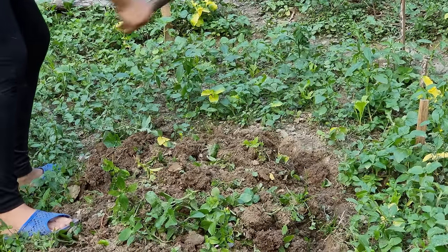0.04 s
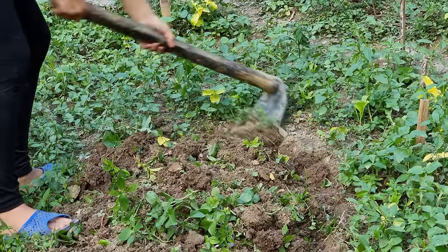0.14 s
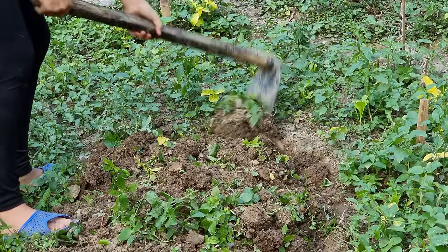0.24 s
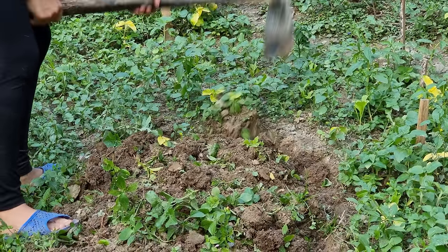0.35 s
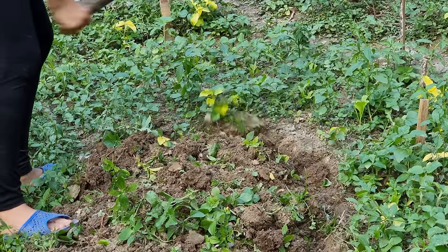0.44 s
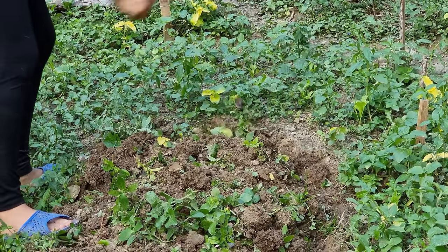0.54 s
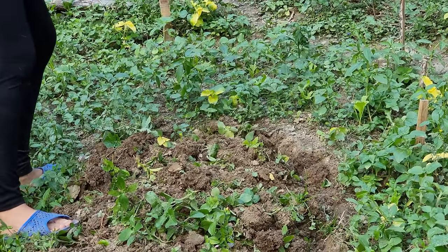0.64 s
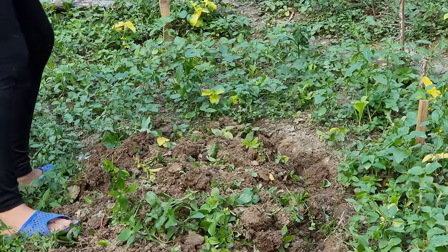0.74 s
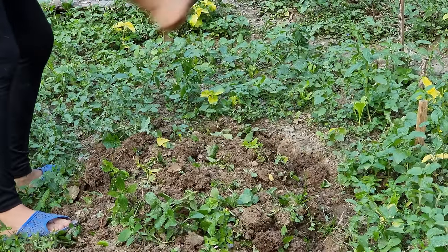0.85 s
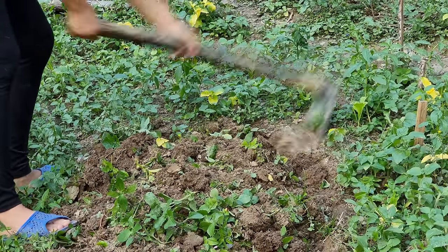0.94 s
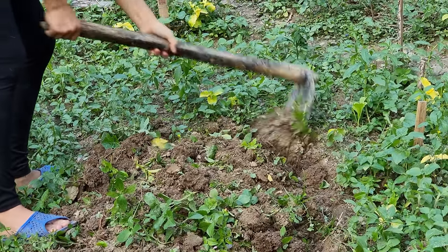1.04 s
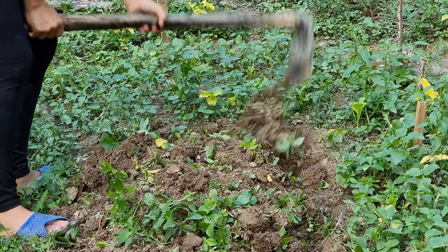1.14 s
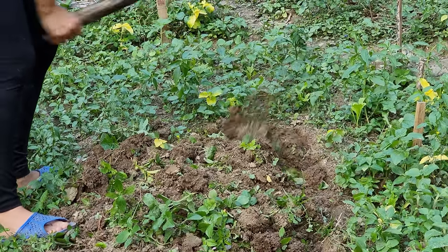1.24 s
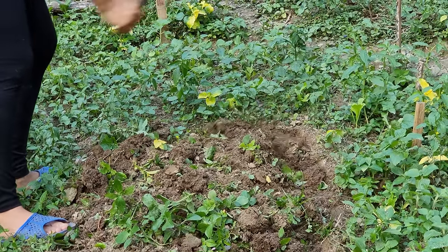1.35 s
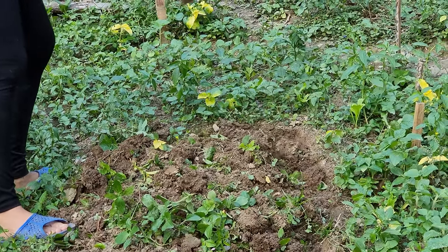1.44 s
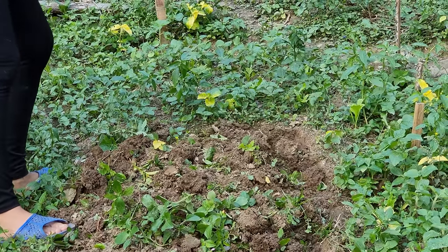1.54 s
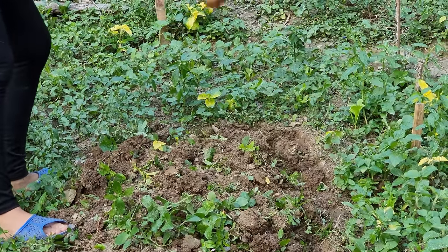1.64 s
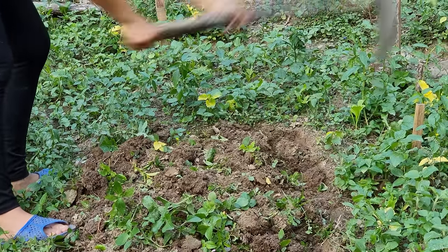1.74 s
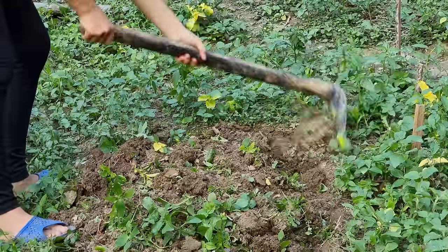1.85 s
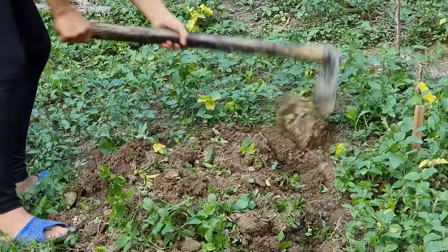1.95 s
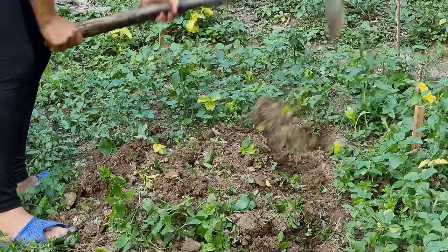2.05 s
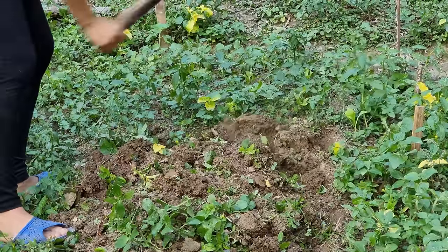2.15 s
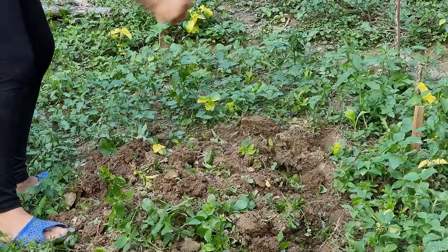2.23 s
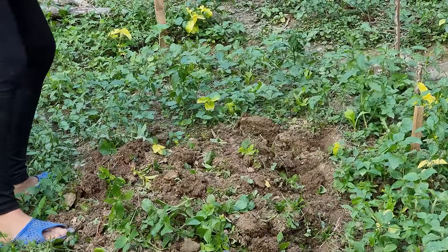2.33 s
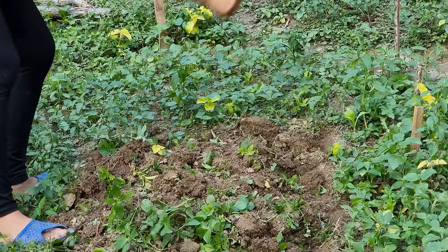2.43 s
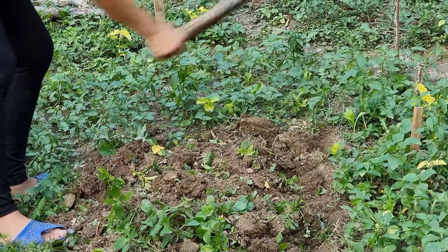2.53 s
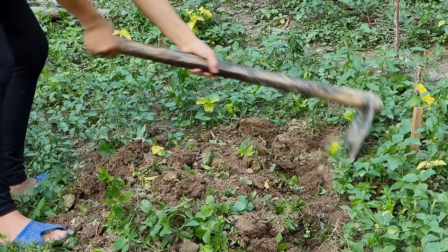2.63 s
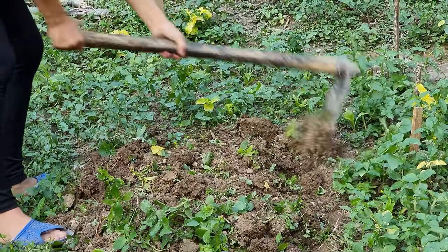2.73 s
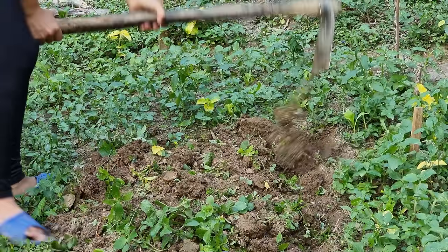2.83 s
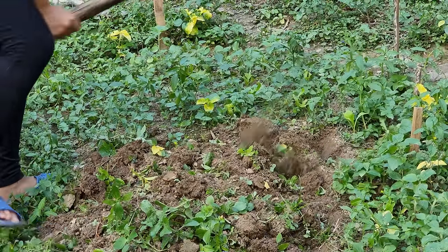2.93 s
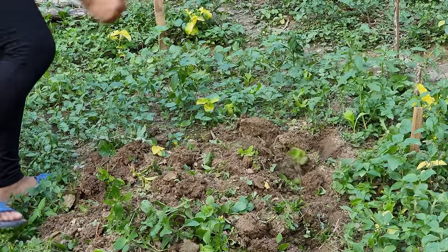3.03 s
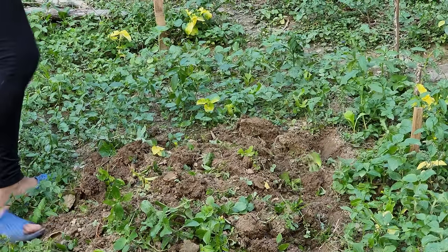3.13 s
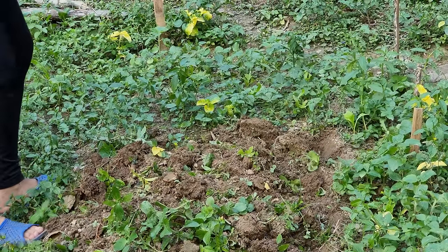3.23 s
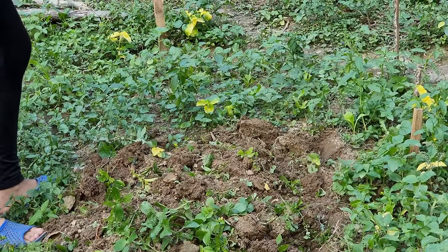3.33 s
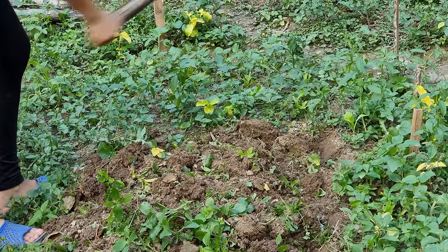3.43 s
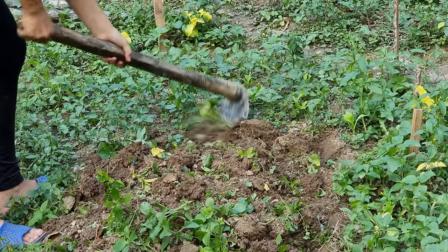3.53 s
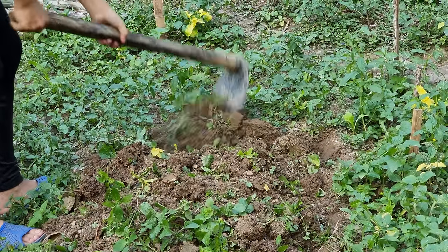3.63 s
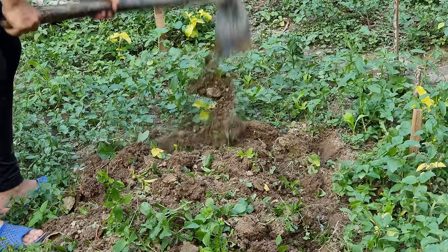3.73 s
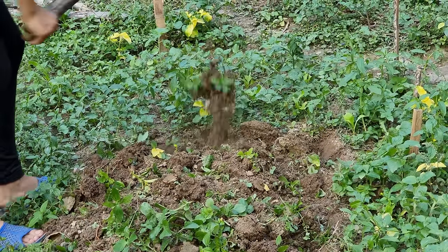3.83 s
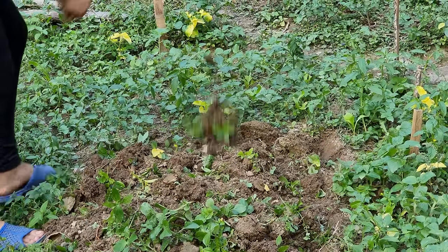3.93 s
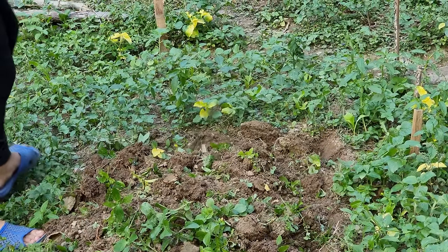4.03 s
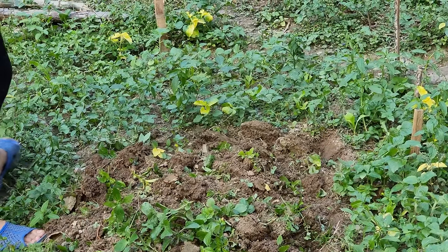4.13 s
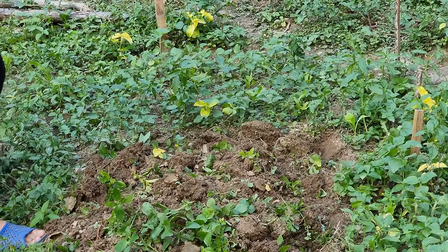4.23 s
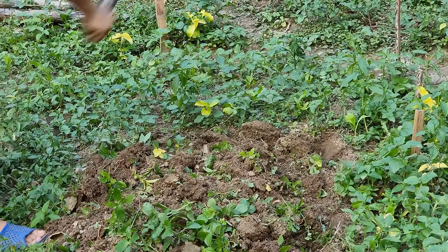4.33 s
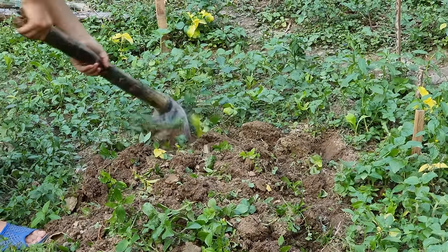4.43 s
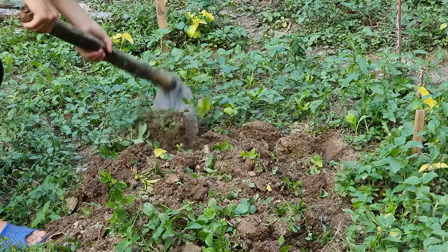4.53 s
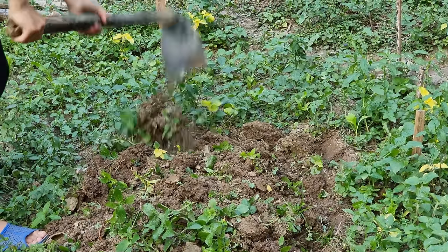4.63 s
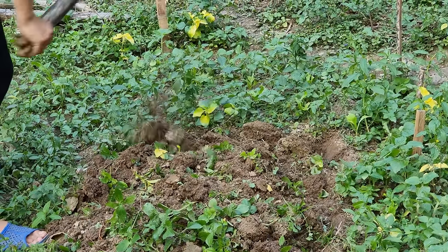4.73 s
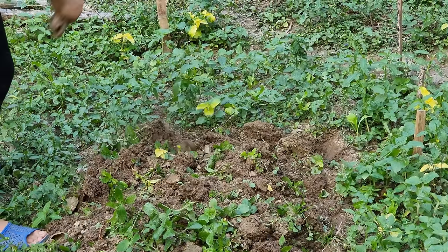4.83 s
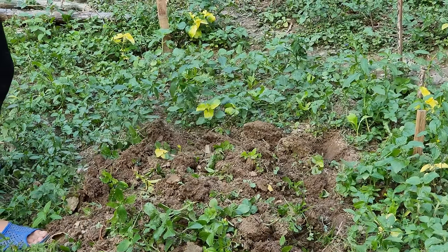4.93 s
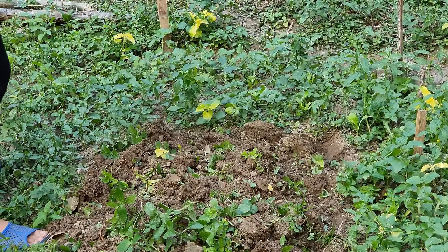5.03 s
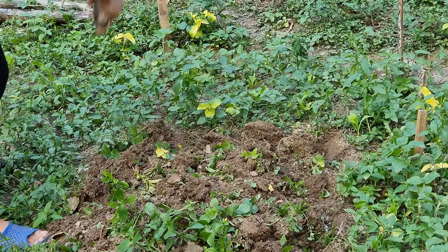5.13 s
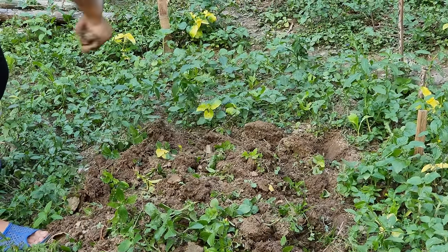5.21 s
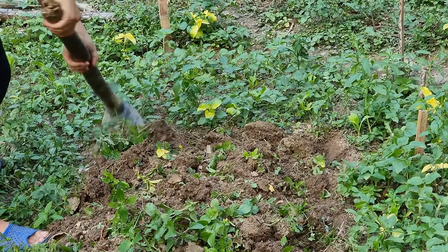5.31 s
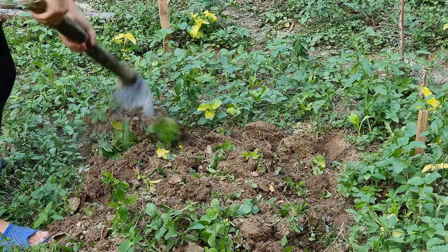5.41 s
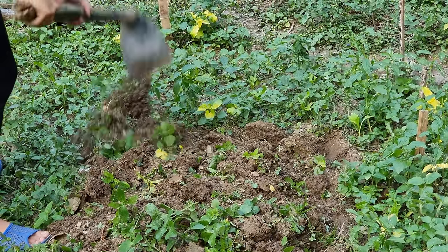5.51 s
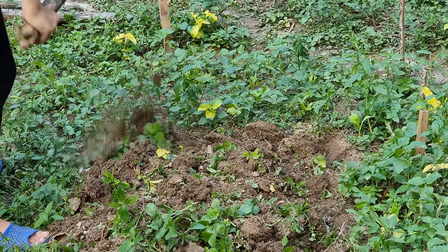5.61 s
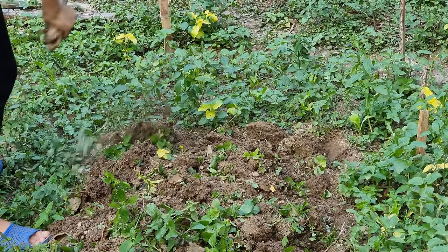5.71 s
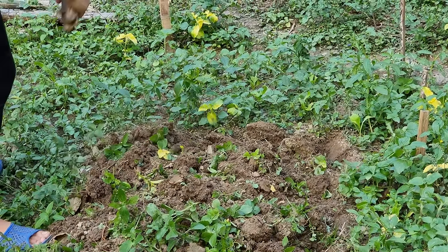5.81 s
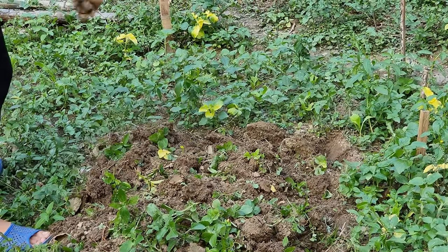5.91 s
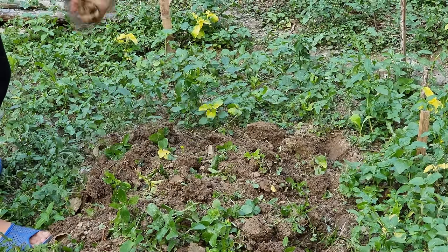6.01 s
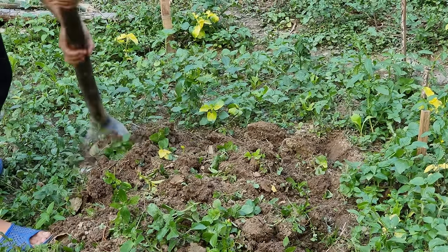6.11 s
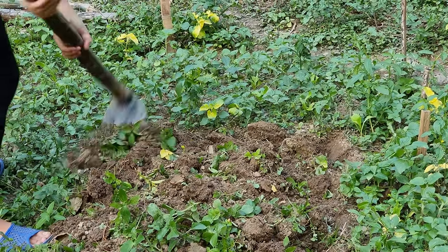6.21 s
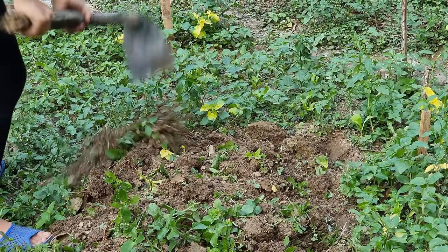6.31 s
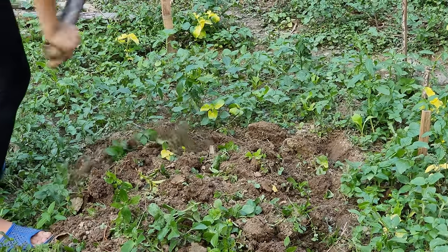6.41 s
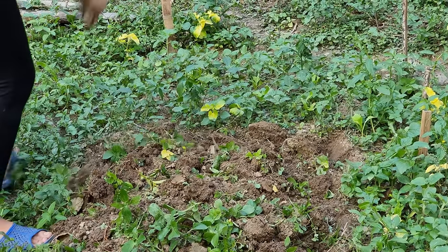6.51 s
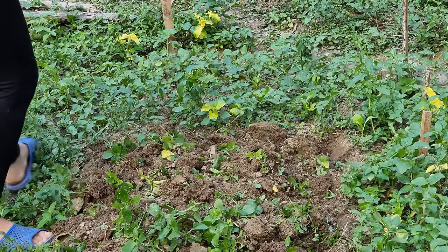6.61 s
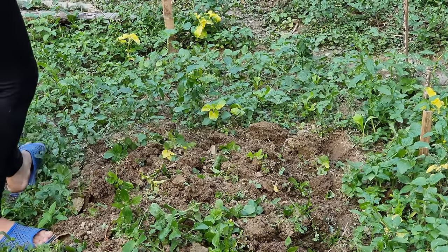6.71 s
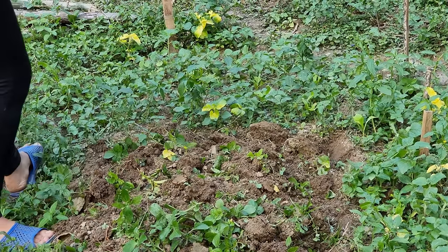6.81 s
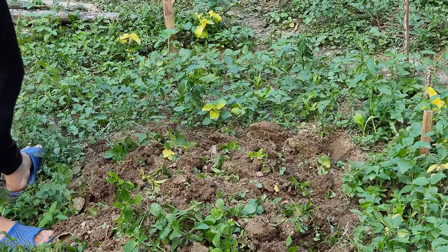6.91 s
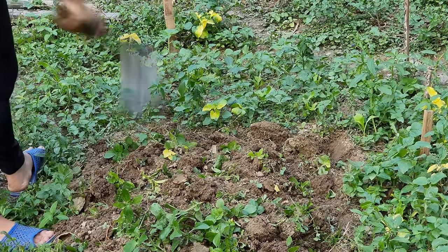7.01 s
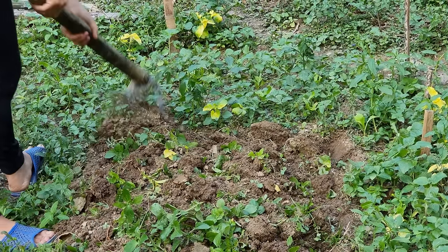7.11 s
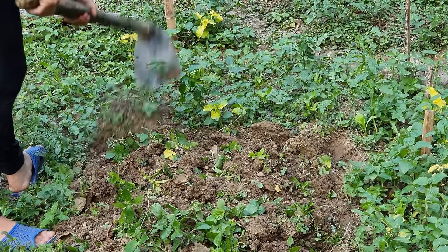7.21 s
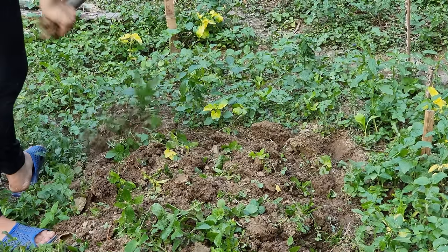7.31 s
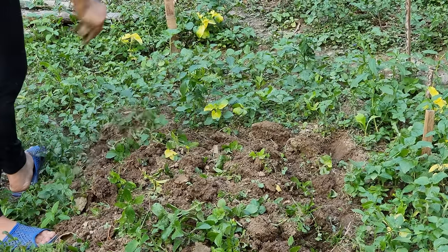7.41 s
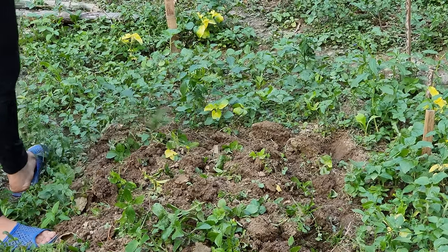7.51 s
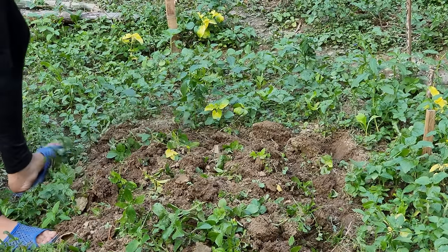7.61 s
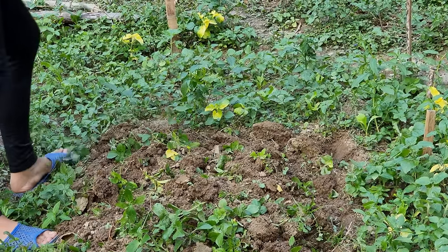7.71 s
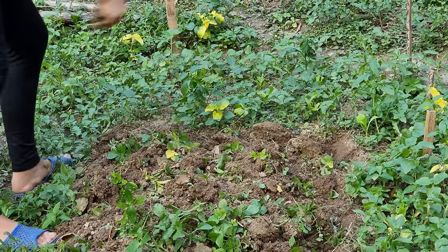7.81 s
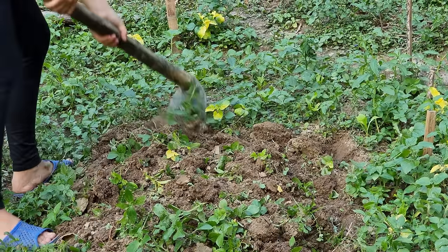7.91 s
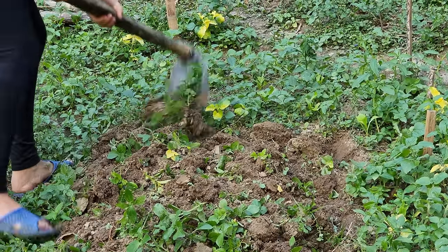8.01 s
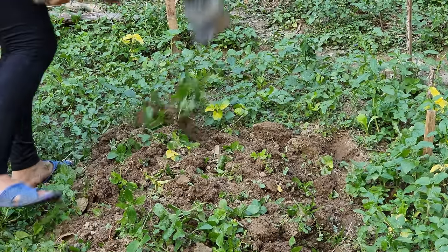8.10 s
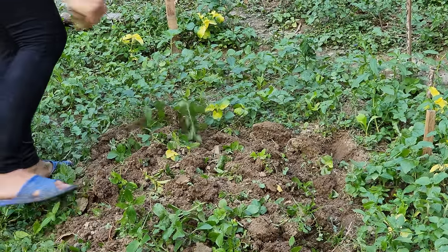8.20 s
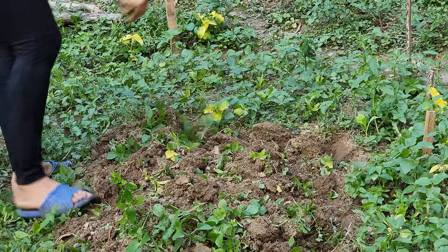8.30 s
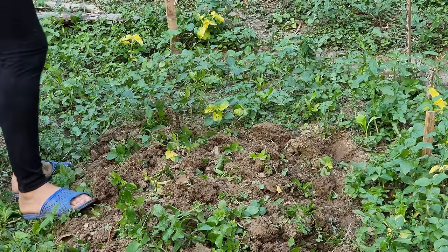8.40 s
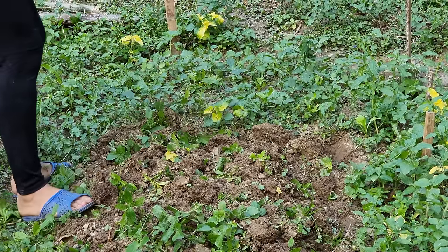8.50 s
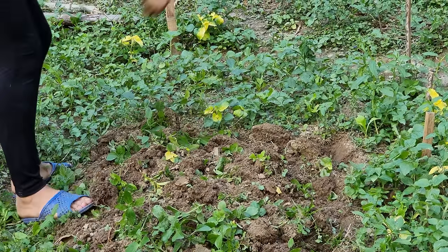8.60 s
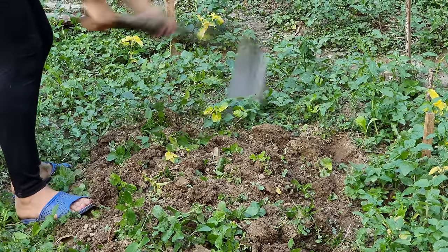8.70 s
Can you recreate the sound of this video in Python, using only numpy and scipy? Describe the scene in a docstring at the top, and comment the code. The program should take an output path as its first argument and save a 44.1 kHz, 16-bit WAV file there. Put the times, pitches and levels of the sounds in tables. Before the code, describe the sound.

Steady hoeing heard from close by in stereo: a sharp double-edged crunch and damped blade clank roughly every 0.85 seconds, followed by a brief crumble of loose earth. Between strokes come small snaps, light taps of crumbs on leaves and soft footfalls. Two faint bird chirps pass early on. Low engines waver far away beneath a steady wide open-air hiss, and the strokes leave a faint short echo.

```python
"""Hoeing garden soil

A long-handled hoe chops ten times in a steady rhythm: noise-driven blade modes and shaped noise bursts.
Each stroke swishes through weeds, bites gritty earth with a short damped clank and leaves crumbs falling.
Stems snap, sandals shuffle, clods drop, the ground thumps; a decaying noise tail echoes the yard faintly.
Far birds are gliding sines, two distant engines are sines of changing rate; filtered noise is the open air.
"""
import sys
import numpy as np
from scipy import signal
from scipy.fft import rfft, irfft, next_fast_len
from scipy.io import wavfile
from scipy.ndimage import uniform_filter1d

SR = 44100
rng = np.random.default_rng(int(sys.argv[2]) if len(sys.argv) > 2 else 0)


def transcribe(u):
    """Save the signal u as a 16-bit wav file named by the first command-line argument.

    u: samples, shape (n,) or (channels, n), limited to [-1, 1]; the rate is SR.
    q: integer samples, one column per channel.
    """
    v = np.clip(np.atleast_2d(u).T, -1, 1)
    q = np.round(v * 32767).astype(np.int16)
    wavfile.write(sys.argv[1], SR, q)


N = 385875
TIME = np.arange(N) / SR
EVENT_TIME = np.arange(-SR // 10, SR // 4) / SR


def from_db(db):
    """Decibels to gain."""
    return 10 ** (np.asarray(db) / 20)


def rms_one(x):
    """Scale to unit power."""
    return x / np.sqrt(np.mean(x ** 2) + 1e-20)


def at_hz(points, hz):
    """Read a spectrum on a log-frequency axis."""
    knots, values = np.transpose(points)
    return np.interp(np.log(hz + 1), np.log(knots), values)


def shaped(x, gain_at):
    """Weight a signal by a function of frequency."""
    size = next_fast_len(x.shape[-1], True)
    hz = np.arange(size // 2 + 1) * SR / size
    return irfft(rfft(x, size) * gain_at(hz), size)[..., :x.shape[-1]]


def coloured(x, spectrum):
    """Give noise a spectrum that falls away beyond its ends; rms 1."""
    (low_hz, low_db), (high_hz, high_db) = spectrum[0], spectrum[-1]
    closed = [(low_hz / 2, low_db - 30), *spectrum, (high_hz * 2, high_db - 40)]
    return rms_one(shaped(x, lambda hz: from_db(at_hz(closed, hz))))


def stereo(mid, side, likeness):
    """Mix mid and side noise so that left and right correlate by the likeness at each frequency."""
    def alike(hz):
        """Correlation of left and right."""
        return np.clip(at_hz(likeness, hz), -1, 1)

    common = shaped(mid, lambda hz: np.sqrt((1 + alike(hz)) / 2))
    opposed = shaped(side, lambda hz: np.sqrt((1 - alike(hz)) / 2))
    return common + opposed * [[1], [-1]]


def drift(knots_per_s, size=N):
    """Random wander: straight lines between normal knots."""
    knots = rng.standard_normal(4096)
    return np.interp(np.arange(size) / SR * knots_per_s, np.arange(len(knots)), knots)


def grains(spread_db):
    """A short dense stream of tiny fractures of uneven size; rms 1."""
    size = len(EVENT_TIME)
    unevenness = np.minimum(rng.exponential(1, size), 4)
    return rms_one(rng.standard_normal(size) * from_db(spread_db * unevenness))


def resonate(x, hz, width_hz):
    """A two-pole resonance that passes white noise with its power kept."""
    r = np.exp(-np.pi * width_hz / SR)
    zeros = np.sqrt((1 - r * r) / 2) * np.array([1, 0, -1])
    poles = [1, -2 * r * np.cos(2 * np.pi * hz / SR), r * r]
    return signal.lfilter(zeros, poles, x + 1e-18)


def burst(db, rise_s, hold_s, fall_s):
    """Envelope that swells up to time zero, holds, then dies away."""
    swell = np.minimum(EVENT_TIME, 0) / rise_s
    decay = np.maximum(EVENT_TIME - hold_s, 0) / fall_s
    return from_db(db) * np.exp(swell - decay)


def add(out, s, sound):
    """Mix in a short sound whose own time zero falls at s."""
    start = max(round((s + EVENT_TIME[0]) * SR), 0)
    out[start:start + len(sound)] += sound[:N - start]


# left-right correlation of the open air: (frequency [Hz], likeness [-1 to 1])
AIR_CORRELATION = [(60, 0.95), (130, 0.89), (290, 0.93), (640, 0.46), (1400, -0.49), (3000, -0.025),
                   (15000, -0.037)]
# foliage hiss colour: (frequency [Hz], relative density [dB per Hz])
HISS_SPECTRUM = [(260, -49), (450, 1.5), (623, -5.5), (756, 0), (876, -1), (1180, 3), (1430, -0.5),
                 (2130, -3), (2950, -0.5), (4960, -10), (5420, -8.5), (5830, -13.5), (7180, -12),
                 (11000, -18), (15500, -15)]


def foliage():
    """Many rustling leaves sum to a steady wide hiss."""
    noise = stereo(*rng.standard_normal((2, N)), AIR_CORRELATION)
    return from_db(-53.05) * coloured(noise, HISS_SPECTRUM)


# far traffic colour: (frequency [Hz], relative density [dB per Hz])
TRAFFIC_SPECTRUM = [(20, -16), (40, -2), (70, 6), (130, -5), (200, -5), (340, -5.5), (420, -9),
                    (540, -30.5), (900, -67)]


def traffic():
    """Far traffic is bass noise whose level flutters."""
    level = from_db(-48.5 + 0.89 * drift(22))
    noise = stereo(*rng.standard_normal((2, N)), AIR_CORRELATION)
    return level * coloured(noise, TRAFFIC_SPECTRUM)


# insect-like hiss: (frequency [Hz], width [Hz], level [dB])
INSECT_BANDS = [(6480, 450, -69), (7150, 260, -72)]


def insects():
    """Thin bands of noise, independent left and right."""
    return sum(from_db(db) * resonate(rng.standard_normal((2, N)), hz, width_hz)
               for hz, width_hz, db in INSECT_BANDS)


FINE_TEXTURE_DB, BROAD_TEXTURE_DB = 4.37, 1.2


def open_air():
    """Hiss, rumble and insect bands sum to the open air, given a random fine and broad level texture."""
    air = foliage() + traffic() + insects()
    bands = signal.stft(air, nperseg=2048)[2]
    fine, broad = rng.standard_normal((2, *bands.shape[1:]))
    broad = uniform_filter1d(broad, size=15, axis=0)  # across frequency
    broad = rms_one(uniform_filter1d(broad, size=2, axis=1))  # across time
    texture = from_db(FINE_TEXTURE_DB * fine + BROAD_TEXTURE_DB * broad)
    return signal.istft(bands * texture)[1][:, :N]


def engine_track(rows):
    """Rate [Hz], phase [rad] and level [dB] of one engine over time."""
    s, *columns = np.transpose(rows)
    hz, db = [np.interp(TIME, s, c) for c in columns]
    phase = 2 * np.pi * np.cumsum(hz) / SR + 2 * np.pi * rng.random()
    return hz, phase, db


# heavy engine labours, slows, picks up again: (time [s], cycle rate [Hz], load [dB])
TRUCK_COURSE = [(0, 38.5, -8), (1.7, 39, -24), (2.95, 39, -22), (3.38, 37.4, 2), (3.77, 35.1, -1.5),
                (4.6, 32.7, 2), (5.41, 31.2, 9), (5.9, 30.4, -4), (7.15, 28.3, -0.5), (7.5, 28.9, -6),
                (7.9, 31.6, -8), (8.75, 33.3, -8.5)]
# exhaust orders 2 to 5: (level at 0 dB load, before muffler [dB], share of load swing [ratio])
EXHAUST_ORDERS = [(-53.5, 0.033), (-45, .95), (-43, 0.42), (-46.5, 0.1)]
MUFFLER_HZ, MUFFLER_DB_PER_OCTAVE = 108.8, -29


def truck():
    """Low exhaust orders follow the load, waver on the way and fall off above the muffler's corner."""
    hz, phase, load_db = engine_track(TRUCK_COURSE)
    out = 0
    for order, (db, share) in enumerate(EXHAUST_ORDERS, 2):
        octaves_above = np.maximum(np.log2(order * hz / MUFFLER_HZ), 0)
        level_db = db + share * load_db + MUFFLER_DB_PER_OCTAVE * octaves_above + drift(3.6)
        out = out + from_db(level_db) * np.sin(order * phase)
    return np.sqrt(2) * out


# lighter engine runs down, pulls away, cruises: (time [s], firing rate [Hz], rms level [dB])
CAR_COURSE = [(0, 75.1, -40.5), (.8, 73.26, -42.5), (1.25, 69.3, -49), (1.85, 61.4, -45), (2.1, 54, -54),
              (2.6, 45.6, -62), (2.72, 43.95, -42), (3.2, 50.65, -45.5), (3.45, 63, -40), (3.7, 70.3, -51),
              (4.0, 73.7, -41.5), (4.6, 69, -45), (5.5, 75.5, -45), (6.6, 73.3, -40.5), (7.5, 70.5, -49),
              (8.75, 72, -42.5)]


def car():
    """Only the firing rate carries this far: one sine that wavers on the way."""
    _, phase, db = engine_track(CAR_COURSE)
    return np.sqrt(2) * from_db(db + drift(3.7)) * np.sin(phase)


def crumbs():
    """Soft crumbs fall at random times, each tapping a leaf at its own pitch."""
    out = np.zeros(N)
    for when, pitch, size in rng.random(size=(140, 3)):
        hz = 1000 * 7 ** pitch
        tap = grains(1.5) * burst(-60 + 9 * size ** 3, rise_s=0.0037, hold_s=0.0078, fall_s=0.013)
        add(out, when * N / SR, resonate(tap, hz, width_hz=hz / 7))
    return out


# stems snap, clods and pebbles drop: (time [s], nominal level [dB], pitch [Hz])
SNAPS = [(0.144, -35, 3270), (0.5087, -34.5, 3020), (0.7938, -34.5, 1850), (1.756, -21, 3100),
         (2.392, -31, 3030), (3.052, -35, 2900), (3.5289, -30.5, 3220), (4.447, -27.5, 3300),
         (4.458, -25, 3300), (4.8796, -33.5, 1020), (5.024, -33, 2863), (5.151, -35, 5340),
         (5.198, -31.5, 1000), (6.3809, -33, 2890), (6.505, -35.5, 1080), (8.4996, -31.5, 3650)]


def snaps():
    """A crack that dies in milliseconds plus a weaker rustle, both partly resonant."""
    out = np.zeros(N)
    for s, db, hz in SNAPS:
        crack = burst(db - 15.5, rise_s=0.00015, hold_s=0.00083, fall_s=0.006)
        rustle = burst(db - 22.5, rise_s=0.0003, hold_s=0.0019, fall_s=0.028)
        snap = grains(1.6) * (crack + rustle)
        add(out, s, resonate(snap, hz, width_hz=500) + 0.73 * snap)
    return out


# spread of phase between the ports: (frequency [Hz], rms difference [rad])
PORT_PHASE_SPREAD = [(100, .12), (500, 0.6), (2500, 1.03), (4000, 1.33), (8000, 2.65), (15000, 2.33)]
# treble mismatch of the ports: (frequency [Hz], left minus right [dB])
PORT_BALANCE = [(1400, 1), (2300, -0.5), (4000, 0), (6800, 4), (8600, -3.5), (11000, 0), (12400, -5),
                (15000, -2)]


def microphones(x):
    """A near sound reaches two ports with phases that differ more in the treble."""
    knots_hz = np.arange(0, SR / 2, 350)
    twist = np.sqrt(2) * np.sin(2 * np.pi * rng.random(len(knots_hz)))

    def response(hz):
        """Opposite halves of the phase and level difference go to left and right."""
        sides = np.array([[.5], [-.5]])
        phase = np.interp(hz, knots_hz, twist) * at_hz(PORT_PHASE_SPREAD, hz)
        return np.exp(1j * sides * phase) * from_db(sides * at_hz(PORT_BALANCE, hz))

    return shaped(x, response)


# echo colour: (frequency [Hz], relative gain [dB])
ECHO_SPECTRUM = [(150, -38), (500, 15), (1200, -5), (3300, 0.5), (6000, 1), (10000, -1), (15000, -68)]


def yard(x, t60_s, treble_t60_s, echo_db):
    """Plants and far walls scatter a faint tail whose treble dies first."""
    t = TIME[:SR]
    noise = rng.standard_normal((2, SR))
    low = signal.sosfilt(signal.butter(2, 4500, fs=SR, output="sos"), noise)
    high = signal.sosfilt(signal.butter(2, 4500, "high", fs=SR, output="sos"), noise[::-1])
    tail = low * from_db(-60 * t / t60_s) + high * from_db(-60 * t / treble_t60_s)
    tail = tail * (1 - np.exp(-(t / 0.0081) ** 2))  # builds up over some 8 ms
    tail = rms_one(tail) / np.sqrt(SR)
    tail = shaped(tail, lambda hz: from_db(at_hz(ECHO_SPECTRUM, hz) + echo_db))
    return signal.fftconvolve(x[None], tail, axes=1)[:, :N]


def cut_envelope(db, cutting_s, fall_s, swish_db, loose_db, trickle_db, loose_fall_s):
    """Weeds brush the blade, the edge bites at once, crumbs scatter in clumps and a few trickle on."""
    clumps = from_db(3.2 * drift(347.6, len(EVENT_TIME)))
    weeds = burst(db + swish_db, rise_s=0.0064, hold_s=0, fall_s=0.001)
    loose = burst(db + loose_db, rise_s=0.00083, hold_s=cutting_s, fall_s=loose_fall_s)
    trickle = burst(db + trickle_db, rise_s=0.0011, hold_s=cutting_s, fall_s=0.11)
    edge = burst(db, rise_s=0.0003, hold_s=cutting_s, fall_s=fall_s)
    return np.sqrt(edge ** 2 + clumps ** 2 * (weeds ** 2 + loose ** 2 + trickle ** 2))


# steel modes damped by the earth: (frequency [Hz], width [Hz], relative level [dB])
BLADE_MODES = [(1570, 630, -9), (2208, 113, -2), (2370, 160, -6), (2865, 135, -4.5), (3490, 160, -2),
               (4360, 270, -12.5), (4740, 280, -9), (5840, 820, -15), (7320, 160, -18)]


def clank(force, tilt_db_per_octave):
    """The cutting force drives the damped blade modes; each bite favours some by chance."""
    luck_db = 1.2 * rng.standard_normal(len(BLADE_MODES))
    out = 0
    for k, (hz, width_hz, db) in enumerate(BLADE_MODES):
        mode_db = db + luck_db[k] + tilt_db_per_octave * np.log2(hz / 2800)
        out = out + (-1) ** k * from_db(mode_db) * resonate(force, hz, width_hz)
    return out


# ground thud colour: (frequency [Hz], relative density [dB per Hz])
THUD_SPECTRUM = [(50, -62), (110, -3.5), (170, -4.5), (330, -6), (480, -17), (900, -13)]
# crunch colour round its own pitch: (multiple of pitch [ratio], relative density [dB per Hz])
CRUNCH_SPECTRUM = [(.3, -35), (.5, -17.5), (.72, -1), (1, 8), (1.3, 4.5), (1.55, -14), (2.5, -27), (5, -3)]
# grit colour: (frequency [Hz], relative density [dB per Hz])
GRIT_SPECTRUM = [(1500, -9), (3000, 1), (4500, -1.5), (6000, 1.5), (7500, 0.5), (9800, 4.5), (11200, -1.5),
                 (12600, 7.5), (13800, 0), (14900, 8), (15600, -27)]


def bite(cutting_s, thud_db, crunch_db, blade_db, grit_db, crunch_hz, tilt_db_per_octave, crumbs_db, weeds_db):
    """The edge breaks grains as it cuts: the ground thuds, earth crunches, grit scratches, the blade clanks."""
    def stroke(db, fall_s, swish_db, loose_db, loose_fall_s):
        """Cut envelope with this bite's weeds and crumbs."""
        return cut_envelope(db, cutting_s, fall_s, weeds_db + swish_db, crumbs_db + loose_db,
                            crumbs_db - 19.5, loose_fall_s)

    thud = coloured(grains(1), THUD_SPECTRUM)
    thud = thud * burst(thud_db + 2.0, rise_s=0.003, hold_s=cutting_s, fall_s=0.013)

    earth = coloured(grains(6.9), [(k * crunch_hz, db) for k, db in CRUNCH_SPECTRUM])
    crunch = earth * stroke(crunch_db, fall_s=0.0024, swish_db=1.0, loose_db=7, loose_fall_s=0.018)

    grit = coloured(grains(7.1), GRIT_SPECTRUM)
    grit = grit * stroke(grit_db, fall_s=0.0037, swish_db=4.5, loose_db=2.5, loose_fall_s=0.024)

    force = grains(5.3)
    force = force * stroke(blade_db - 1.5, fall_s=0.00063, swish_db=2.0, loose_db=9.5, loose_fall_s=0.012)
    blade = clank(force, tilt_db_per_octave)

    # thrown soil falls back as a toneless crumble
    soil = coloured(grains(2.1), [(900, -9.5), (2000, 1), (3200, 6.5), (4500, 1.0), (8000, -3.5)])
    lumps = from_db(3.5 * drift(120, len(EVENT_TIME)))
    fallback = burst(blade_db + crumbs_db - 2, rise_s=0.0017, hold_s=cutting_s, fall_s=0.042)
    return thud + crunch + grit + blade + soil * lumps * fallback


# one row a stroke, levels nominal: (time [s], second bite delay [s], cutting time [s], thud [dB],
# crunch [dB], blade [dB], grit [dB], second bite re first [dB], crunch pitch [Hz],
# blade tilt [dB per octave], crumbs re stroke [dB], weeds re stroke [dB])
HOE_STROKES = [(0.1708, 0.011, 0.0043, -43.5, -26, -20.5, -12, 2.5, 1120, -4, -19.5, -16.5),
               (0.9863, 0.0042, 0.0069, -39, -40.5, -18.5, -24.5, 6.5, 1560, 1, -16.5, -16.5),
               (1.8199, 0.0076, 0.0042, -37.5, -25, -18, -16.5, -5.5, 1400, 5.5, -13, -12),
               (2.6720, 0.0044, 0.0034, -36, -27.5, -18.5, -18, 5.5, 1830, -4, -15.5, -20),
               (3.5650, 0.0091, 0.0036, -35.5, -13.5, -15.5, -14, -9, 1240, -1, -19, -19.5),
               (4.4692, 0.014, 0.0084, -38, -25.5, -21.5, -15.5, 6.5, 1160, 2, -19.5, -14),
               (5.3216, 0.0068, 0.006, -35, -17, -11.5, -18, -8, 1190, 1.5, -17, -19),
               (6.1373, .0130, 0.011, -36.5, -32, -31.5, -23.5, 2.5, 1220, 0, -14, -4.5),
               (7.0659, 0.0092, 0.0055, -26.5, -18.5, -16.5, -16, -7.5, 1210, 0, -15, -18),
               (7.923, 0.0093, .0058, -31, -25.5, -20, -13.5, 2.5, 1170, -3, -21.5, -14)]
# second bite: shorter, below the gritty crust
SECOND_CUT_SHARE, SECOND_GRIT_DB, SECOND_THUD_DB = 0.95, -4, -1


def hoe():
    """Each stroke bites twice: the edge breaks the gritty crust, then the blade drives into the earth below."""
    out = np.zeros(N)
    for s, delay_s, cutting_s, thud_db, crunch_db, blade_db, grit_db, second_db, *soil in HOE_STROKES:
        first = bite(cutting_s, thud_db, crunch_db, blade_db, grit_db, *soil)
        second = bite(cutting_s * SECOND_CUT_SHARE, thud_db + SECOND_THUD_DB, crunch_db + second_db,
                      blade_db + second_db, grit_db + SECOND_GRIT_DB, *soil)
        add(out, s, first)
        add(out, s + delay_s, second)
    return out


# sandal footfalls and landing clods: (time [s], nominal level [dB])
SOFT_PLOPS = [(1.157, -34), (2.25, -40), (2.326, -32.5), (2.978, -33), (3.957, -27), (7.133, -38),
              (8.519, -35.5)]


def plops():
    """Soft impacts: dull low-mid noise that swells and dies in tens of milliseconds."""
    out = np.zeros(N)
    for s, db in SOFT_PLOPS:
        body = coloured(grains(0.33), [(140, -9), (240, 2), (350, -9), (520, -30)])
        add(out, s, body * burst(db - 9.0, rise_s=0.0049, hold_s=0.017, fall_s=0.018))
    return out


# faint far birds: (time [s], start [Hz], end [Hz], length [s], level [dB])
BIRD_CHIRPS = [(1.388, 2620, 2120, 0.085, -59), (1.601, 2700, 2870, 0.14, -58)]


def birds():
    """Short thin sine glides with a fast random pitch wobble."""
    out = np.zeros(N)
    for s, start_hz, end_hz, length_s, db in BIRD_CHIRPS:
        glide_hz = np.interp(EVENT_TIME, [0, length_s], [start_hz, end_hz])
        hz = glide_hz + 70 * drift(260, len(EVENT_TIME))
        tone = np.sin(2 * np.pi * np.cumsum(hz) / SR)
        add(out, s, tone * burst(db, rise_s=0.006, hold_s=length_s, fall_s=0.008))
    return out


# deep cuts shake the ground: (time [s], level [dB])
GROUND_THUMPS = [(2.675, -30.5), (4.474, -31), (6.139, -29)]


def thumps():
    """The ground answers a deep cut with a short burst of bass noise."""
    out = np.zeros(N)
    for s, db in GROUND_THUMPS:
        body = coloured(grains(.5), [(45, -12), (100, -3), (140, -18)])
        add(out, s, body * burst(db, rise_s=0.004, hold_s=0.0077, fall_s=0.046))
    return out


# faint echoes of the clank ring on after the stroke: (time [s], frequency [Hz], level [dB])
RINGING_ECHOES = [(2.735, 3290, -43), (4.589, 2834, -57), (5.385, 3480, -48), (6.21, 1410, -50),
                  (7.185, 3480, -49), (8.015, 1450, -51)]


def ringing_echoes():
    """A thin ringing echo at one pitch swells and dies shortly after a stroke."""
    out = np.zeros(N)
    for s, hz, db in RINGING_ECHOES:
        ring = grains(1.5) * burst(db, rise_s=0.023, hold_s=0.011, fall_s=0.027)
        add(out, s, resonate(ring, hz, width_hz=20))
    return out


def scene():
    """The hoe and debris close by, their echo, and the distance behind."""
    near = hoe() + snaps() + plops() + thumps() + crumbs() + ringing_echoes()
    echo = yard(near, t60_s=0.49, treble_t60_s=0.42, echo_db=-23.0)
    return microphones(near) + echo + truck() + car() + birds() + open_air()


CUTOFF_HZ = 16300


def record(dry):
    """Peaks are rounded and the top is cut."""
    rounded = 0.9 * np.tanh(dry / 1.067)
    lowpass = signal.cheby2(16, 45, CUTOFF_HZ, fs=SR, output="sos")
    return signal.sosfiltfilt(lowpass, rounded)


dry = scene()
out = record(dry)
transcribe(out)
```